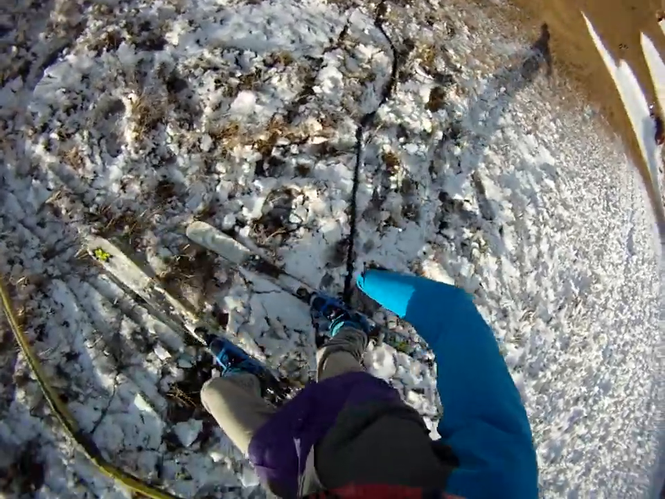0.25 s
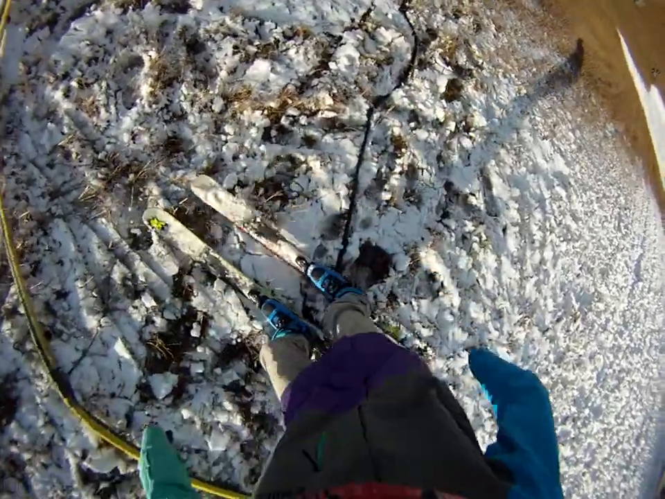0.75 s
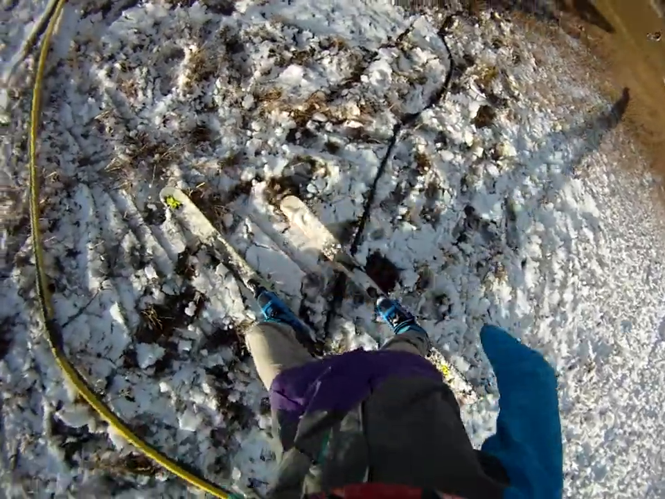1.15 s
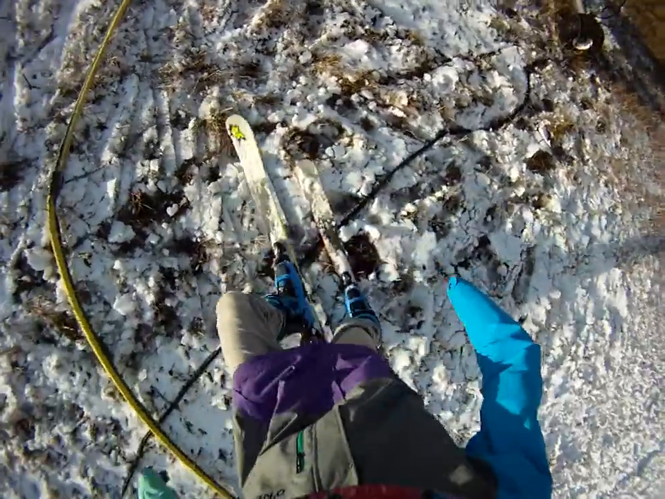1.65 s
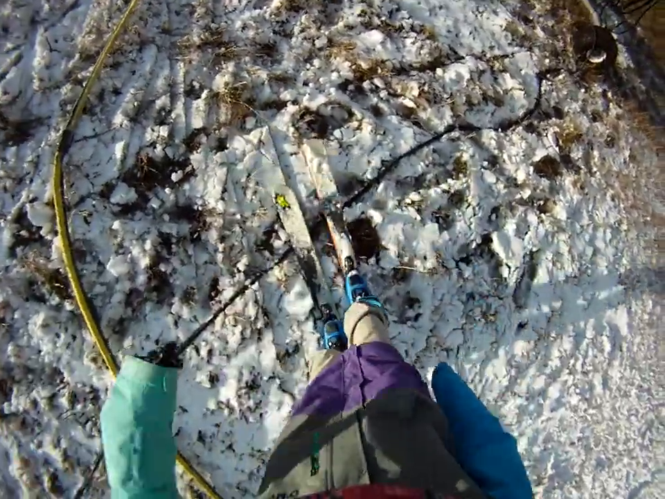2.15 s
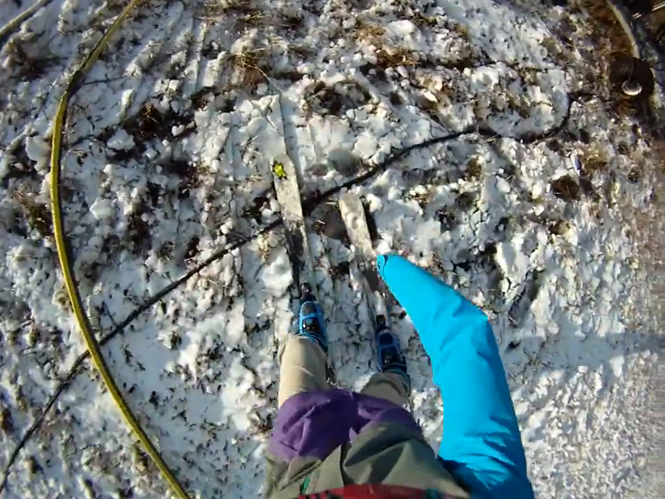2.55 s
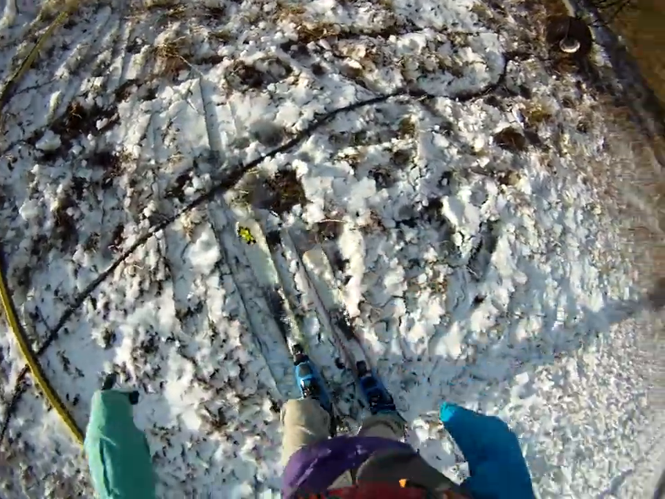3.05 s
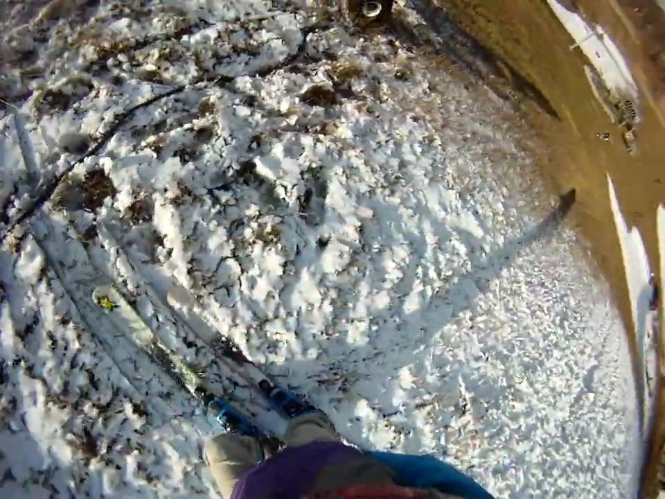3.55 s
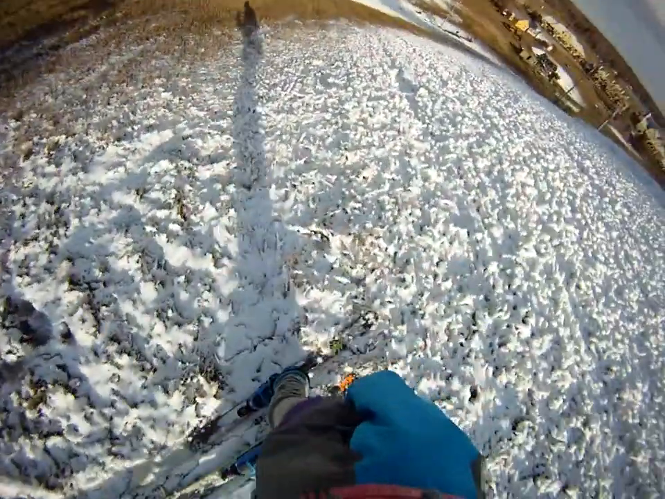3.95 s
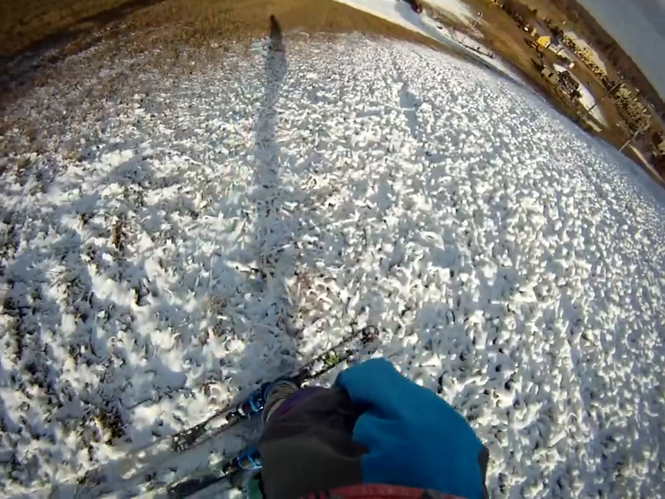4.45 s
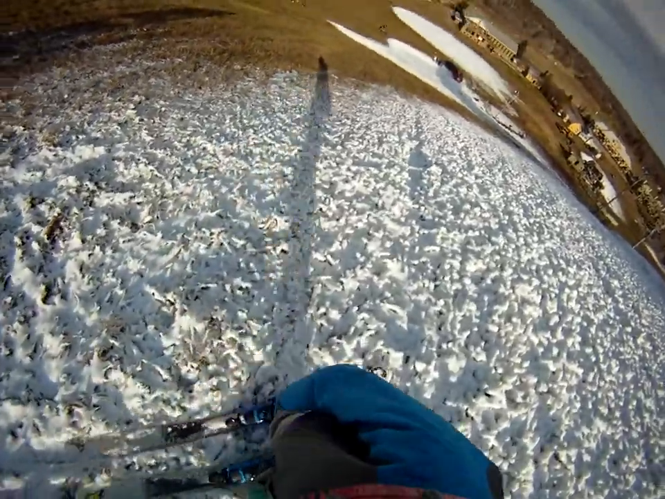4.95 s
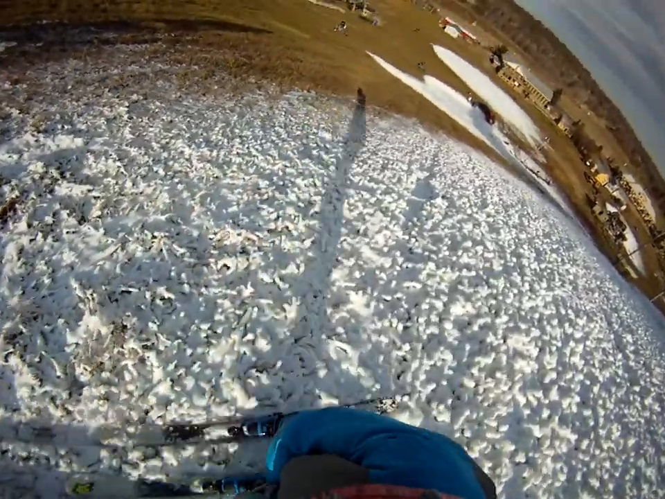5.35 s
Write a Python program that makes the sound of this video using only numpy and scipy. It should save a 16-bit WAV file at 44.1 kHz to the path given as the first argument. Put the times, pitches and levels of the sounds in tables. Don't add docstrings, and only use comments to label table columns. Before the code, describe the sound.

Quiet open snowy slope heard through a sealed camera case. Low wind flutters and a small far engine chugs faintly, with light binding ticks. Past three seconds a hard knock jolts the mount, followed by two gritty ski scrapes, low thumps and plastic rattles. Then faint scuffs and soft gusts as the engine fades.

```python
import sys
import numpy as np
from scipy import signal
from scipy.io import wavfile
from scipy.ndimage import uniform_filter1d

SR = 44100
rng = np.random.default_rng(int(sys.argv[2]) if len(sys.argv) > 2 else 0)


def unload_audio(sound):
    columns = np.transpose(np.atleast_2d(sound))
    steps = np.round(np.clip(columns, -1, 1) * 32767)
    wavfile.write(sys.argv[1], SR, steps.astype(np.int16))


def voltage_ratio(decibels):
    exponent = np.asarray(decibels, float) / 20
    return 10 ** exponent


N = 246519


def evened(x):
    return x / np.sqrt(np.mean(x ** 2) + 1e-20)


def noise():
    return rng.standard_normal(N)


def curves(tables):
    s, *columns = np.vstack(tables).T
    return [np.interp(np.arange(N) / SR, s, column) for column in columns]


def lumps(seconds):
    size = int(seconds * SR)
    return evened(uniform_filter1d(uniform_filter1d(noise(), size), size))


def coloured(x, points):
    hz, db = np.transpose(points)
    bin_hz = abs(np.fft.fftfreq(2 ** 14, 1 / SR))
    gain_db = np.maximum(np.interp(np.log(bin_hz + 1), np.log(hz), db), -100)
    log_gain = np.log(voltage_ratio(gain_db))
    taps = np.fft.ifft(np.exp(np.conj(signal.hilbert(log_gain)))).real[:2 ** 13]
    return evened(signal.oaconvolve(x, taps)[:N])


def resonate(x, hz, width_hz):
    turn = np.exp(2j * np.pi * np.cumsum(hz * np.ones(len(x))) / SR)
    r = np.exp(-np.pi * width_hz / SR)
    return 2 * (turn * signal.lfilter([1 - r], [1, -r], x / turn)).real


def body(x, modes):
    total = 0
    for k, (hz, width_hz, db) in enumerate(modes):
        ring = resonate(resonate(x, hz, width_hz), hz, width_hz)
        total = total + (-1) ** k * voltage_ratio(db) * evened(ring)
    return total


def low_pass(x, hz, size):
    taps = signal.firwin(size, hz, window=("kaiser", 7), fs=SR)
    return signal.oaconvolve(x, taps[None], "same")


def swings(blows):
    t = np.arange(N) / SR
    s, db, hz, rise_s, t60_s = np.transpose(blows)[:, :, None]
    age = np.maximum(t - s, 0)
    rise = np.sin(np.pi / 2 * np.minimum(age / rise_s, 1)) ** 2
    fade = rise * voltage_ratio(-60 * np.maximum(age - rise_s, 0) / t60_s)
    return (voltage_ratio(db) * fade * np.sin(2 * np.pi * hz * age)).sum(0)


PADDING_DB = -11
# start_s, peak_db, swing_hz, rise_s, t60_s
FORWARD_BLOWS = [
    (3.4035, -11, 60, .003, .04),
    (3.4035, -17, 67, .003, .36),
    (3.674, -17.5, 68, .055, .25),
    (3.6765, -31, 90, .004, .04),
    (3.688, -27, 90, .004, .05),
    (3.7655, -18, 84, .003, .15),
    (3.787, -12, 67, .005, .29),
    (3.897, -20.5, 69, .007, .38),
]
# start_s, peak_db, swing_hz, rise_s, t60_s
BACKWARD_BLOWS = [
    (3.3988, -4, 102, .0025, .022),
    (3.832, -23, 62, .006, .06),
]


def jolts():
    swing = swings(FORWARD_BLOWS) - swings(BACKWARD_BLOWS)
    rounded = signal.sosfiltfilt(signal.butter(3, 270, fs=SR, output="sos"), swing)
    return rounded + voltage_ratio(PADDING_DB) * (swing - rounded)


def grit(per_s, spread_db, smooth):
    size = voltage_ratio(spread_db * np.minimum(rng.exponential(1, N), 4)) * noise()
    return evened(size * (rng.random(N) < per_s / SR)) + smooth * noise()


def patchy(x, depth_db):
    z = signal.stft(x, nperseg=256, noverlap=192)[2]
    patches = uniform_filter1d(rng.standard_normal(z.shape), size=3, axis=0)
    patches = evened(uniform_filter1d(patches, size=4, axis=1))
    return evened(signal.istft(z * voltage_ratio(depth_db * patches), nperseg=256, noverlap=192)[1][:N])


HOLD_S, SHAKE_DB, THUD_DB = 0.053, -9, -13
# start_s, bite_s, level_db, t60_s, sharp_edge_db
STROKES = [
    (3.472, 0.019, -37, 0.57, -12),
    (3.59, .03, -48, 0.34, -10),
    (3.654, 0.071, -35, 0.24, -2.5),
    (3.824, 0.0093, -41, 0.26, -7),
    (3.9, 0.017, -48, 0.52, -12),
]
# middle_s, peak_db, length_s, sharp_edge_db
SCUFFS = [
    (.34, -56, .08, -17),
    (1.02, -64.5, .37, -3),
    (3.08, -63, .12, -7),
    (4.04, -66, .1, 2),
    (4.3, -63, .1, -16),
    (4.43, -63, .12, -3),
    (4.67, -68, .15, 1),
    (5.37, -61, .14, -10),
    (5.14, -67, .06, -8),
]
# freq_hz, level_db
CRUST = [(180, -53), (300, -48.5), (403, -23), (571, -63), (759, -26), (864, -20), (1150, -12), (1350, -16),
         (1660, -4.5), (2350, -11), (2700, -28), (3510, -79), (5940, -120)]
# freq_hz, level_db
EDGE = [(1530, -46), (2600, -2.5), (2820, 0.5), (3220, -5.5), (3550, -1.5), (4630, -15), (5200, -11),
        (5430, -19), (5900, -65), (7670, -96), (13000, -120)]


def skis():
    t = np.arange(N) / SR
    s, bite_s, db, t60_s, sharp_db = np.transpose(STROKES)[:, :, None]
    fade_db = -60 * np.maximum(t - s - bite_s - HOLD_S, 0) / t60_s
    drags = np.clip((t - s) / bite_s, 0, 1) ** 1.25 * voltage_ratio(db + fade_db)
    drag = np.linalg.norm(drags, axis=0)
    bite = np.linalg.norm(drags * voltage_ratio(sharp_db), axis=0)

    s, db, length_s, sharp_db = np.transpose(SCUFFS)[:, :, None]
    scuffs = voltage_ratio(db) * np.exp(-(2 * (t - s) / length_s) ** 2)
    dull = drag + scuffs.sum(0)
    sharp = bite + (scuffs * voltage_ratio(sharp_db)).sum(0)

    crust = patchy(coloured(grit(per_s=1800, spread_db=2.5, smooth=3.2), CRUST), depth_db=2.3)
    crust = voltage_ratio(1.0 * lumps(.008)) * crust
    edge = patchy(coloured(grit(per_s=1800, spread_db=6.0, smooth=1.6), EDGE), depth_db=0.0)
    edge = voltage_ratio(1.04 * lumps(0.0031)) * edge
    shake = body(noise(), [(63.0, 49.0, SHAKE_DB)])
    thud = body(noise(), [(306, 390, THUD_DB)])
    return dull * crust + sharp * edge + drag * shake + bite * thud


CASE_DB, CASE_DB_PER_OCTAVE = 0, -17
# start_s, peak_db, ring_hz, treble_db, t60_s
TICKS = [(0, -33, 1700, -16, 0.0091), (1.469, -36, 1405, -10.5, 0.029), (1.494, -32.5, 1740, -14, 0.03),
         (3.3817, -22, 2150, -13.5, 0.084), (3.399, -7.5, 1543, -13, 0.02),
         (3.412, -36.5, 1580, -15, 0.065), (3.4592, -23.5, 1680, -8.5, 0.026),
         (3.486, -31.5, 1700, -1.5, 0.062), (3.591, -31, 1700, -0.5, 0.017), (3.782, -30, 1570, -18, 0.022),
         (3.819, -22.5, 2280, -11, 0.033), (3.823, -18.5, 1700, -14, .02), (3.898, -31, 1820, -16, .014),
         (4.002, -42, 1710, -15, .019), (4.335, -35, 1440, -12, 0.019), (4.532, -35.5, 1475, -19, 0.023),
         (4.641, -45, 1740, -5, 0.047), (5.361, -43, 2030, -7, 0.065)]
# centre_hz, width_hz, level_db
CASE = [(1065, 560, 6), (1385, 1100, 6), (1700, 80, -8.5), (2300, 470, -4.5)]


def ticks():
    out = np.zeros(N + SR)
    t = np.arange(SR // 8) / SR
    for s, db, hz, treble_db, t60_s in TICKS:
        rattle = rng.standard_normal(len(t)) * np.minimum(t / 0.00069, 1) * voltage_ratio(-60 * t / t60_s)
        case_db = CASE_DB + CASE_DB_PER_OCTAVE * np.log2(hz / 1500)
        ring = voltage_ratio(case_db) * evened(body(rattle, CASE)) + body(rattle, [(hz, 450, 0)])
        bright = body(rattle, [(3290, 1670, 23.0), (5400, 1700, -29)])
        tick = ring / abs(ring).max() + voltage_ratio(treble_db) * bright / abs(bright).max()
        out[round(s * SR):][:len(t)] += voltage_ratio(db) * tick
    return signal.sosfilt(signal.butter(8, 940, "high", fs=SR, output="sos"), out[:N])


CHUG_HZ = 26.4
FACING_DB = -60
LOW_DB, LOW_LAG, HIGH_DB, HIGH_LAG = -2.5, 0.58, -5, 0.39
# time_s, lead_turns
CHUG_LEAD = [(0, -.15), (.3, -.15), (1.1, .06), (2.4, .08), (3.2, .0), (4.2, -.23), (4.85, -.87),
             (5.6, -.5)]
# time_s, chug_db, exhaust_hz
ENGINE = [
    (0, -63, 2300),
    (.4, -63, 2300),
    (1.2, -59, 2260),
    (1.7, -56, 2123),
    (2.4, -56.5, 2155),
    (3.3, -58, 2130),
    (4.1, -61.5, 2080),
    (4.6, -64, 2080),
    (5.59, -67.5, 2144),
]
# centre_hz, width_hz, level_db
ENGINE_LOW = [(895, 30, -18.5), (1134, 200, -9.5), (1542, 200, -8.5), (1722, 96, -7.5)]
# centre_hz, width_hz, level_db
ENGINE_HIGH = [(2820, 160, -9), (3380, 560, -6.5), (3787, 1050, -12)]


def puff(since, rise, length):
    return np.minimum(since / rise, 1) * np.exp(-(since / length) ** 2)


def engine():
    t = np.arange(N) / SR
    chug_db, exhaust_hz = curves([ENGINE])
    low_db = LOW_DB - LOW_LAG * (chug_db - FACING_DB)
    high_db = HIGH_DB - HIGH_LAG * (chug_db - FACING_DB)
    turns = CHUG_HZ * t + curves([CHUG_LEAD])[0] + .02 * lumps(.02) + .16
    blur = 0.07 * np.clip(t - 3.2, 0, 1)
    strength_db = 1.1 * rng.standard_normal(200)[turns.astype(int)]

    main = voltage_ratio(strength_db) * puff(turns % 1, rise=0.19, length=0.23)
    weaker = 0.27 * puff((turns - .55) % 1, rise=0.23, length=0.088)
    gate = main + weaker + 0.13 + blur
    hiss = gate * noise()
    pipe = body(noise(), [(exhaust_hz * 0.942, 170, 0.5), (exhaust_hz * 1.036, 170, 0.5),
                          (exhaust_hz * 1.13, 200, -5)])
    exhaust = gate * pipe / uniform_filter1d(pipe ** 2, size=350) ** 0.8
    sharp = body((main + 0.14 + blur) * noise(), ENGINE_HIGH)
    return voltage_ratio(chug_db) * (evened(exhaust) + voltage_ratio(low_db) * body(hiss, ENGINE_LOW) + voltage_ratio(high_db) * sharp)


AIR_DB, SWAY_DB, LUMPY_DB, GUST_S = -61.5, -6.5, 4, 0.075
# time_s, wind_db
BREEZE = [(0, -54), (1.0, -57), (2.0, -54), (3.0, -56.5), (4.2, -51), (4.8, -59.5), (5.59, -58)]
# freq_hz, level_db
BUFFET = [(8, -9), (20, 10.5), (40, 2), (55, 3), (90, -52.5)]
# freq_hz, level_db
AIR = [(53, -19.5), (90, -2.5), (113, -6), (209, -8.5), (486, -13), (570, -14), (679, -15), (868, -11),
       (1320, -13), (2130, -13.5), (2920, -20), (5310, -22), (6000, -16.5), (7800, -91), (13200, -120)]
# middle_s, peak_db, flap_hz
GUSTS = [(0.121, -50.5, 30.2), (.24, -37.5, 21.4), (.3, -49, 60.7), (.38, -53, 24.4), (.56, -48, 21),
         (0.781, -46, 40), (.85, -43, 24.3), (.9, -44, 66), (1.279, -46.5, 61.6), (1.431, -44, 25.1),
         (1.651, -51.5, 53.4), (2.009, -51, 36.6), (2.19, -46, 25), (2.24, -49, 62), (2.35, -49.5, 50),
         (2.63, -48, 56), (3.069, -48, 21.1), (3.172, -53, 61.7), (3.26, -41.5, 20.6), (3.34, -43, 39.5),
         (3.48, -32, 24.3), (3.571, -34.5, 29.6), (3.65, -36.5, 35), (4.39, -47, 48.2), (5.0, -46.5, 42.6),
         (5.38, -51, 54.5)]


def wind():
    breeze = voltage_ratio(curves([BREEZE])[0] + LUMPY_DB * lumps(.04))
    buffet = coloured(noise(), BUFFET)
    sway = resonate(resonate(noise(), 57.0, 26.7), 57.0, 26.7)
    air = voltage_ratio(AIR_DB + 0.82 * lumps(0.012)) * patchy(coloured(noise(), AIR), depth_db=0.2)
    gusts = np.zeros(N)
    age = np.arange(-SR // 10, SR // 10) / SR
    for s, db, hz in GUSTS:
        flap = np.exp(-(2 * age / GUST_S) ** 2) * np.sin(2 * np.pi * (hz * age + rng.random()))
        gusts[round(s * SR) - SR // 10:][:len(age)] += voltage_ratio(db) * flap
    return breeze * (buffet + voltage_ratio(SWAY_DB) * evened(sway)) + gusts + air


def scene():
    mono = jolts() + skis() + ticks() + engine() + wind()
    return np.array([mono, mono])


# freq_hz, level_db
APART = [(18, -24), (30, -19), (211, -2), (815, 0.5), (1780, -2), (2250, -18), (2990, 11.5), (5030, 12),
         (6040, -9), (7060, 1), (10700, -14), (12200, -32), (15000, -77)]


def spread(held):
    loudness = np.sqrt(abs(uniform_filter1d(np.diff(held[0], prepend=0) ** 2, size=1500)))
    apart = voltage_ratio(-25.5) * loudness * coloured(noise(), APART)
    apart = apart + voltage_ratio(-35) * lumps(.003) * uniform_filter1d(held[0], size=60)
    return held + np.array([apart, -apart])


GAP_CENTRE_HZ, GAP_WIDTH_HZ, GAP_SHARE, FAINT_DB = 12100, 1700, .55, -88


def gaps(x):
    hz, t, z = signal.stft(x, SR, nperseg=1024)
    chance = rng.random((65, len(t) // 2 + 1))
    chance = np.repeat(np.repeat(chance, 8, axis=0), 2, axis=1)[:len(hz), :len(t)]
    centre = 1 - (2 * (hz - GAP_CENTRE_HZ) / GAP_WIDTH_HZ) ** 4
    kept = (chance > GAP_SHARE * centre[:, None]) | (abs(z) > voltage_ratio(FAINT_DB))
    return signal.istft(z * kept, SR, nperseg=1024)[1][:, :N]


def roll_off(x):
    return signal.sosfilt(signal.butter(12, 16520, fs=SR, output="sos"), x)


SLOW_EDGE_HZ, TOP_EDGE_HZ = 5730, 15230


def record(dry):
    slow = signal.resample_poly(low_pass(dry, SLOW_EDGE_HZ, size=201), 40, 147, axis=1)
    held = signal.resample_poly(np.repeat(slow, 4, axis=1), 147, 160, axis=1)[:, 1:]
    held = np.pad(held, ((0, 0), (0, 8)))[:, :N]
    mix = gaps(low_pass(spread(held), TOP_EDGE_HZ, size=301))
    return roll_off(mix)


dry = scene()
out = record(dry)
unload_audio(out)
```